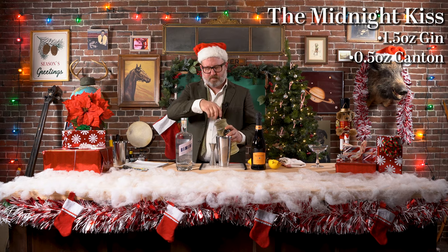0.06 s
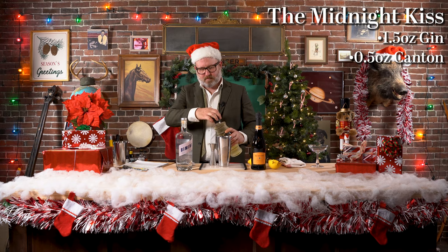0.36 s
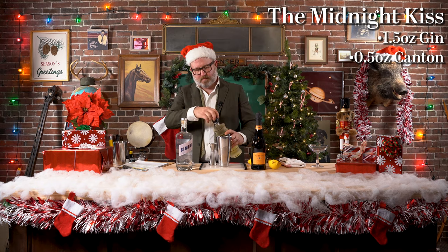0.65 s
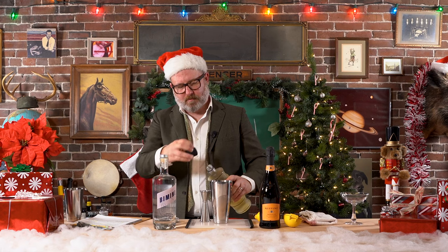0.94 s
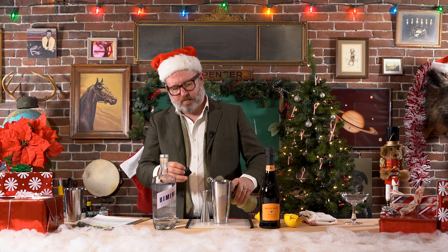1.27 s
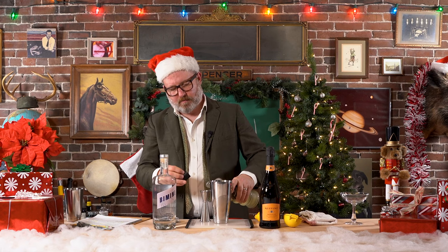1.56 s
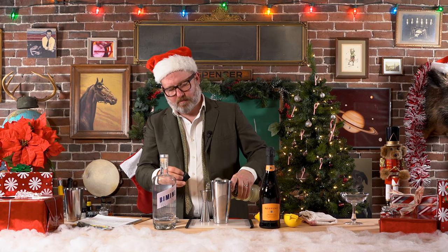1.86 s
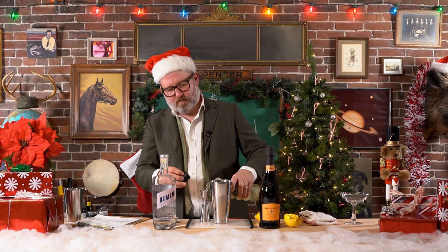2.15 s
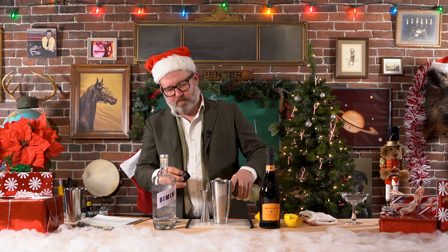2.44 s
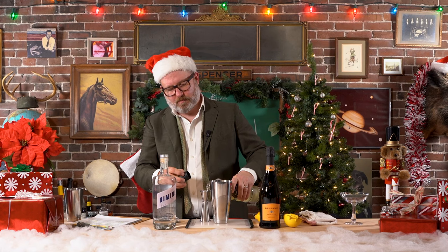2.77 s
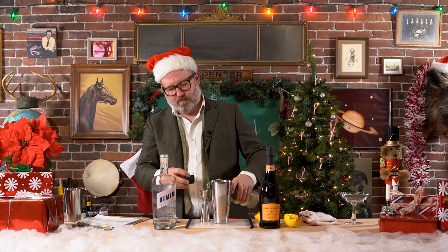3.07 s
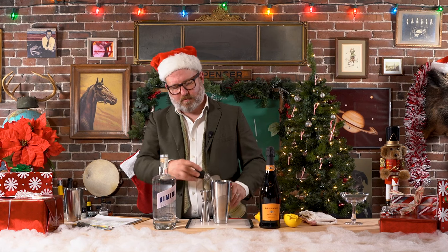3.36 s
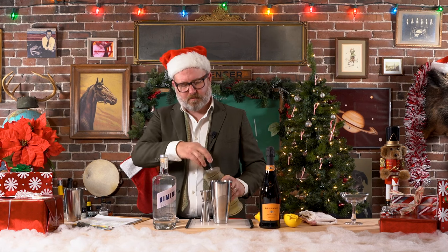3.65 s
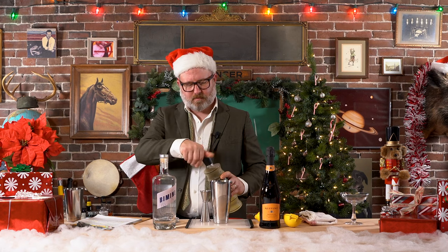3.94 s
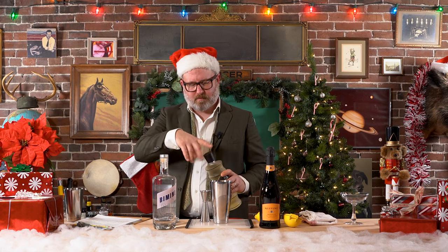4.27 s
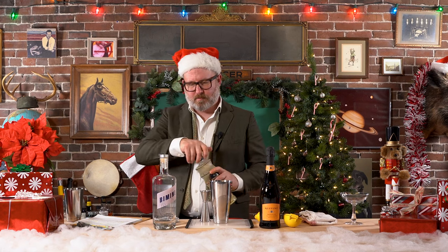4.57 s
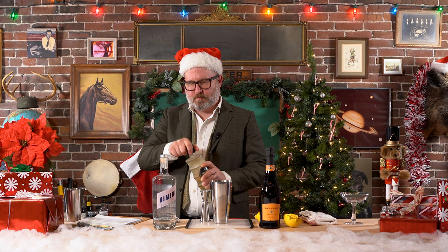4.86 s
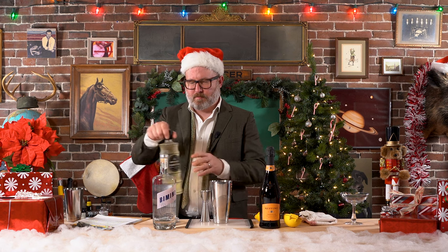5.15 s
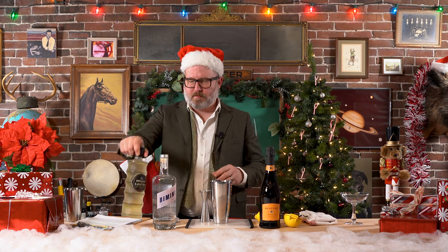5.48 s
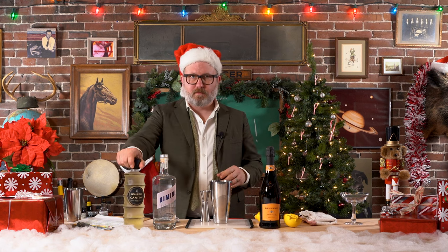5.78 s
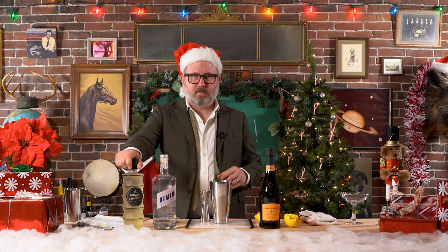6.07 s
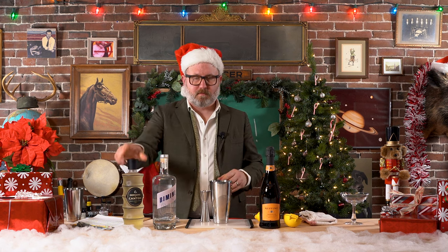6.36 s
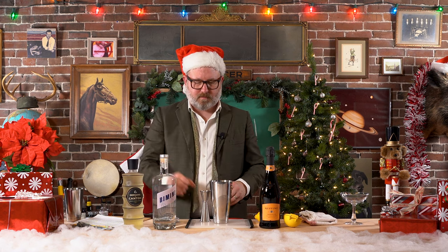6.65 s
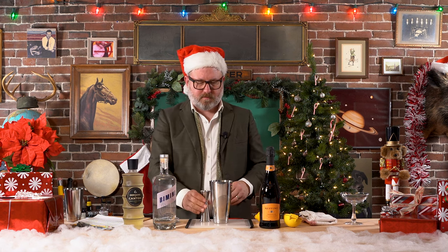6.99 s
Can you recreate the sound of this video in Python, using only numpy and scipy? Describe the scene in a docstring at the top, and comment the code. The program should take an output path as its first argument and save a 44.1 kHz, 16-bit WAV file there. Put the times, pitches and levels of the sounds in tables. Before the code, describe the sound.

A metal jigger clatters against a cocktail shaker between soft pours, and a bottle knocks twice on a wooden bar over low hum.

```python
"""A steel jigger is emptied into a shaker and tapped on its rim, clattering and ringing.
It is refilled from a softly glugging bottle and emptied again; the liquid sounds through its bubbles.
A bottle knocks twice on the wooden bar, rocking on its base as the boards and the glass ring.
Cloth rubs at the microphone, which is clipped to a jacket; ventilation and mains hum fill the room.
A limiter holds the knocks down."""
import sys
import numpy as np
from scipy import signal
from scipy.fft import rfft, irfft
from scipy.io import wavfile
from scipy.ndimage import uniform_filter1d, minimum_filter1d

SR = 44100
rng = np.random.default_rng(int(sys.argv[2]) if len(sys.argv) > 2 else 0)


def master(y):
    """Save y as 16-bit WAV."""
    cut = np.clip(np.atleast_2d(y).T, -1, 1)
    pcm = np.round(cut * 32767)  # scale
    wavfile.write(sys.argv[1], SR, pcm.astype(np.int16))


N = 313992
T = np.arange(N) / SR
CUTOFF_HZ = 15850


# steel modes, first pour: (frequency [Hz], relative level [dB], t60 [s])
FIRST_MODES = [(1547, 2, .25), (1529, -9, .16), (865, -4, .06), (2450, -10, .13), (2560, -13, .14),
               (2974, -6, .27), (3149, -14, .16), (3430, -12, .14), (3762, -13, .14), (3943, -13, .16),
               (4178, -16, .16), (4823, -13, .18), (5579, -18, .09), (7306, -15, .13), (7898, -14, .12)]
# second pour, with more liquid and another grip: (frequency [Hz], relative level [dB], t60 [s])
SECOND_MODES = [(1802, -3, 0.26), (1836, -3.5, 0.21), (2128, -1.5, 0.092), (2400, -12, 0.14),
                (2980, -12.5, 0.28), (3634, -9, 0.23), (3683, -3, 0.084), (4070, -12.5, 0.16),
                (4300, -12.5, 0.12), (4670, -9, 0.059), (4930, -15, 0.076), (5490, -9, 0.061),
                (7200, -11, 0.064), (9620, -7, 0.037)]
# contact clatter at each pour: (frequency [Hz], relative density [dB])
FIRST_CLATTER_SPECTRUM = [(300, -28), (600, -20), (850, 4), (1000, 2.5), (1400, 4), (1800, -18),
                          (3000, -5.5), (5000, -20.5), (9000, -24.5)]
SECOND_CLATTER_SPECTRUM = [(300, -23), (430, 9.5), (650, -20), (1000, -0.5), (1300, 5), (1650, -13),
                           (2050, -2.5), (2800, -29), (4200, -26), (9000, -32)]

def jigger(refill_s=2.0):
    """The jigger strikes the shaker in two bouts, ringing differently after the refill."""
    contacts = rim_contacts()
    early = contacts[:, 0] < refill_s
    first = steel(contacts[early], FIRST_MODES, FIRST_CLATTER_SPECTRUM, ring_gain_db=-8, slosh=0.0018,
                  clatter_t60_s=0.026, crack_t60_s=0.012, slip_db=-25)
    second = steel(contacts[~early], SECOND_MODES, SECOND_CLATTER_SPECTRUM, ring_gain_db=-6.5,
                   slosh=0.0039, clatter_t60_s=0.03, crack_t60_s=0.0073, slip_db=-8.5)
    return first + second + shaker_air(contacts[~early])


# rim taps; the edge gives more crack and less clatter, a loose grip more ring:
# (time [s], strength [dB], sharpness [dB], ring re strength [dB])
RIM_TAPS = [(.022, -40, 8, -2), (.044, -32.5, -5, -16), (0.1361, -32, -1.5, -7.5), (.225, -35.5, -3, -6.5),
            (0.3984, -42, 3, -6), (.634, -21.5, -4.5, -8.5), (0.6393, -23, -2.5, -4.5),
            (0.651, -25.5, 0, -10), (.705, -35, 4, 10), (0.7223, -26.5, 0, 1.5), (.770, -40, 12.5, -30),
            (3.5322, -46.5, 12, -7), (3.570, -36, 2.5, -12), (3.612, -37.5, -4, 3), (3.622, -34, 2.5, -1.5),
            (3.662, -30, 0.5, -13), (3.670, -32, 1, -2), (3.680, -24.5, -2.5, -8), (3.797, -41.5, -2, -7),
            (3.917, -38.5, -7, -7.5), (3.981, -36.5, -5.5, -5), (4.0335, -34.5, -8, -2),
            (4.039, -27, -5.5, -0.5), (4.058, -33, -5.5, 4.5), (4.091, -26.5, -0.5, -1), (4.133, -38, 6, 2),
            (4.2164, -42, -6, -10), (4.2337, -25, -3, -11), (4.253, -27.5, -3, -2.5), (4.2758, -23, 1, 1)]
# chatter along the rim: (start [s], length [s], strength [dB], ring re strength [dB])
RIM_DRAGS = [(0.0, 0.066, -42.5, 4.5), (0.298, .14, -54.5, 2), (.66, .075, -42.5, 3.5),
             (4.027, .13, -40.5, -1.5), (4.255, .06, -37, -1)]

def rim_contacts(per_drag=8, spread_db=1.0, drag_sharp_db=-1.0):
    """Taps and random drag contacts: (time [s], clatter [dB], crack [dB], ring [dB])."""
    rows = list(RIM_TAPS)
    for start_s, length_s, db, loose_db in RIM_DRAGS:
        times_s = start_s + length_s * (np.arange(per_drag) + rng.random(per_drag)) / per_drag
        rows += [(s, db + spread_db * rng.standard_normal(), drag_sharp_db, loose_db) for s in times_s]
    times_s, db, sharp_db, loose_db = np.transpose(rows)
    return np.column_stack([times_s, db - sharp_db, db + sharp_db, db + loose_db])


# steel-on-steel crack: (frequency [Hz], relative density [dB])
CRACK_SPECTRUM = [(1200, 4.5), (2100, 8.5), (3000, 7.5), (4200, -11), (5500, 5), (6400, -9.5), (7500, 3.5),
                  (8500, -3), (9800, -5.5), (12000, -15), (15000, -4), (16000, -54)]

def steel(contacts, modes, clatter_spectrum, ring_gain_db, slosh, clatter_t60_s, crack_t60_s, slip_db):
    """Each contact gives a hollow clatter, a bright crack and a ring detuned by the moving liquid."""
    times_s, clatter_db, crack_db, ring_db = np.transpose(contacts)
    hz, mode_db, t60_s = np.transpose(modes)[:, :, None]
    ringing, t = np.zeros(N), T[:SR // 3]
    decay = amp(mode_db - 60 * t / t60_s)
    for s, ping_db, db in zip(times_s, crack_db, ring_db):
        # the contact point sets each mode's strength
        strength, detune, phase = rng.standard_normal((3, len(hz), 1))
        waves = np.sin(2 * np.pi * (hz * (1 + slosh * detune) * t + phase))
        add(ringing, s, amp(db + ring_gain_db) * np.sum(amp(2 * strength) * decay * waves, axis=0))
        add(ringing, s, amp(ping_db - 14) * ping())
    # the rim skids on in three small slips
    slips_s = times_s[:, None] + rng.uniform(0.0033, 0.0133, size=(len(times_s), 3))
    strikes = clicks(times_s, crack_db) + clicks(slips_s.ravel(), np.repeat(crack_db + slip_db, 3))
    clatter = bursts(clicks(times_s, clatter_db), clatter_spectrum, clatter_t60_s, contact_s=0.00056)
    crack = bursts(strikes, CRACK_SPECTRUM, crack_t60_s, contact_s=0.0005)
    return ringing + clatter + crack


def ping(count=14, t60_s=0.028):
    """High modes of the hand-held jigger, different at each contact and soon damped."""
    t = T[:SR // 20]
    hz = rng.uniform(2400, 13500, (count, 1))
    modes = amp(at_hz(CRACK_SPECTRUM, hz)) * np.sin(2 * np.pi * hz * t)
    return np.sum(modes, axis=0) * amp(-60 * t / t60_s)


def shaker_air(contacts, ref_hz=509.6, ref_s=3.7, fall_hz_per_s=301.4, t60_s=0.16, gain_db=-10.5):
    """Contacts thump the air in the shaker; its note falls as the jigger closes over the mouth."""
    out, t = np.zeros(N), T[:SR // 3]
    decay = amp(-60 * t / t60_s)
    for s, clatter_db, _, _ in contacts:
        hz = ref_hz - fall_hz_per_s * (s + t - ref_s)
        add(out, s, amp(clatter_db + gain_db) * decay * np.sin(2 * np.pi * np.cumsum(hz) / SR))
    return out


# bar top modes: (frequency [Hz], relative level [dB], t60 [s])
BAR_MODES = [(114, 4, 0.076), (182.4, 2, 0.31), (237.5, -5.5, 0.54), (290, -2, .36), (357, 2.5, 0.34),
             (365, -12, 0.35), (444.5, -1.5, 0.36), (515, -27, 0.16), (612, -5.5, 0.45), (657.5, -10, 0.56),
             (796, -2, 0.24), (863, -20, 0.26), (1000, -12, 0.15)]
# bottle modes: (frequency [Hz], relative level [dB], t60 [s])
GLASS_MODES = [(1703, 3, .38), (2100, -5, .2), (3219, -13, .3), (4812, -8, .22), (4854, -6, .2),
               (7545, -13, .24), (8950, -18, .12)]
# thud of the bar: (frequency [Hz], relative density [dB])
THUD_SPECTRUM = [(50, -5), (120, -2.5), (220, 5), (350, 8), (550, -7.5), (900, -14.5), (1400, -24.5),
                 (2100, -39), (2800, -43.5), (4500, -46.5), (6500, -61), (12000, -93)]
# glass meeting wood: (frequency [Hz], relative density [dB])
CLACK_SPECTRUM = [(300, -0.5), (600, 4), (900, -0.5), (1400, -2.5), (2100, -10.5), (2700, -24.5),
                  (3500, -20), (5000, -29), (6200, -39), (8000, -28), (12000, -57)]

def bottle():
    """The base thumps the boards as it settles, and the glass rings."""
    times_s, thud_db, clack_db, glass_db = settling().T
    strikes = clicks(times_s, thud_db)
    push = signal.lfilter(*signal.butter(2, 1500, fs=SR), strikes + 1e-18)  # wood gives way
    boards = sum(ring(push * amp(db - 15.5), hz, t60_s) for hz, db, t60_s in BAR_MODES)
    glass = sum(ring(clicks(times_s, glass_db + db), hz, t60_s) for hz, db, t60_s in GLASS_MODES)
    thud = amp(-5.5) * bursts(strikes, THUD_SPECTRUM, t60_s=0.42, contact_s=0.0029)
    clack = amp(8) * bursts(clicks(times_s, clack_db), CLACK_SPECTRUM, t60_s=0.19, contact_s=0.00021)
    return boards + thud + glass + clack


# bottle set down, relative levels:
# (time [s], delay until flat [s], thud [dB], clack [dB], glass ring [dB], thud loss per rock [dB])
BOTTLE_KNOCKS = [(3.4059, .002, -15.5, -36.5, -45.5, 4.5), (5.7855, .008, -12.5, -32, -40, 2)]

def settling(count=4, rock_s=0.0215, jitter=0.12, fade_db=12.5, heel_thud_db=-2.5, heel_clack_db=-17):
    """The heel touches, the base lands and rocks: (time [s], thud [dB], clack [dB], glass ring [dB])."""
    rows = []
    for heel_s, flat_s, thud_db, clack_db, glass_db, loss_db in BOTTLE_KNOCKS:
        rows.append((heel_s, thud_db + heel_thud_db, clack_db + heel_clack_db, glass_db + heel_clack_db))
        s = heel_s + flat_s
        for k in range(count):
            rows.append((s, thud_db - k * loss_db, clack_db - k * fade_db, glass_db - k * fade_db))
            s += rock_s * (1 + jitter * rng.uniform(-1, 1))
    return np.array(rows)


# large bubbles, low in the shaker, high in the jigger: (time [s], relative level [dB], frequency [Hz])
LARGE_BUBBLES = [(.045, -32, 730), (.126, -23.5, 910), (0.138, -23, 736), (.192, -26.5, 1004),
                 (.204, -30, 910), (.229, -30, 796), (.288, -29, 786), (.377, -32, 796), (.403, -22, 790),
                 (.529, -29, 864), (1.037, -52.5, 2010), (2.013, -47, 2100), (2.059, -45, 1770),
                 (2.117, -37.5, 2196), (2.278, -48, 1860), (2.467, -52, 2160), (2.58, -53, 2120),
                 (2.853, -59, 3350), (3.57, -27.5, 1390), (4.869, -34, 1900)]

def bubbles(rise_per_s=1.85, tone_db=-2, splash_db=-5, t60_at_1khz_s=0.031):
    """A bubble forms with a splash, rings briefly and rises in pitch as it nears the surface."""
    out, t = np.zeros(N), T[:SR // 10]
    attack = 1 - np.exp(-t / 0.001)
    for s, db, hz in LARGE_BUBBLES + glugs():
        t60_s = t60_at_1khz_s * (hz / 1000) ** 0.27  # small bubbles ring for more cycles
        tone = amp(tone_db - 60 * t / t60_s) * np.sin(2 * np.pi * hz * t * (1 + rise_per_s * t))
        splash = amp(splash_db) * puff(hz, t60_s=0.026)
        add(out, s, amp(db) * attack * (tone + splash))
    return out


# glugs of the tilted bottle: (time [s], relative level [dB])
BOTTLE_GLUGS = [(1.22, -50), (1.396, -56), (1.620, -48), (1.790, -44.5), (1.970, -56), (2.158, -43.5),
                (2.356, -48.5), (2.557, -52.5), (2.757, -55.5), (2.974, -63)]

def glugs(empty_hz=2210, full_hz=3187, fill_tau_s=0.53):
    """One bubble per glug, higher as the jigger fills: (time [s], level [dB], frequency [Hz])."""
    start_s = BOTTLE_GLUGS[0][0]
    return [(s, db, full_hz - (full_hz - empty_hz) * np.exp((start_s - s) / fill_tau_s))
            for s, db in BOTTLE_GLUGS]


# jigger emptied into the shaker: (start [s], length [s], level [dB])
JIGGER_POURS = [(-.05, 0.17, -46), (0.287, 0.21, -57.5), (3.56, 0.61, -55)]

def stream(bubbles_per_s=450, t60_cycles=24, low_hz=720, high_hz=1500, pitches=20):
    """Falling liquid traps a crowd of small bubbles."""
    born = rng.random(N) < bubbles_per_s / SR
    size_db = 7.1 * np.minimum(rng.exponential(1, N), 4)
    kicks = born * amp(size_db) * rng.choice([-1, 1], N)
    pitch_index = rng.integers(0, pitches, N)
    crowd = sum(ring(kicks * (pitch_index == k), hz, t60_cycles / hz)
                for k, hz in enumerate(np.geomspace(low_hz, high_hz, pitches)))
    return gestures(*np.transpose(JIGGER_POURS), rest_db=-np.inf) * unit_rms(crowd)


# fingers and cap: (time [s], level [dB], frequency [Hz])
FINGER_TICKS = [(3.53, -44, 5070), (4.448, -50, 7400), (4.484, -50, 2180), (4.607, -43.5, 4540),
                (4.782, -41.5, 7560), (5.7945, -45, 8340)]
# bottle neck at each glug: (level re glug [dB], frequency [Hz])
GLUG_TICKS = [(-2.5, 1290), (-13, 7400)]

def ticks(t60_s=0.022):
    """Tiny contacts of fingers and cap, and the tick in the neck that starts each glug."""
    out = np.zeros(N)
    neck = [(s, db + tick_db, hz) for s, db in BOTTLE_GLUGS for tick_db, hz in GLUG_TICKS]
    for s, db, hz in FINGER_TICKS + neck:
        add(out, s, amp(db) * puff(hz, t60_s))
    return out


# arm movements, relative levels: (start [s], length [s], rumble [dB], clip tug [dB], sleeve [dB])
ARM_MOVES = [(-.1, 0.6, -32.5, -65, -52.5), (0.483, 0.21, -17.5, -63, -60.5), (0.74, 0.14, -25.5, -67, -74),
             (1.14, 0.49, -39, -57, -60.5), (1.695, 0.13, -49, -37.5, -62), (2.128, 0.38, -55, -45, -71),
             (3.446, 0.18, -29, -62, -48), (3.6, 0.097, -19, -60, -46.5), (3.828, 0.416, -35.5, -62, -49.5),
             (4.444, 0.1, -22, -51, -75), (4.573, 0.31, -24, -34.5, -52.5), (4.877, 0.28, -31, -33.5, -45),
             (5.208, 0.36, -32.5, -47, -50.5), (6.46, 0.47, -39.5, -42.5, -55.5),
             (7.023, .15, -42, -52, -55.5)]
# quick brushes of cloth and fingers: (centre [s], length [s], level [dB])
CLOTH_BRUSHES = [(.203, .038, -55), (0.348, 0.083, -64), (0.453, 0.016, -54.5), (1.007, 0.33, -64.5),
                 (3.29, 0.14, -66), (4.478, 0.027, -48.5), (4.537, 0.078, -53), (4.652, 0.022, -51.5),
                 (4.78, 0.064, -47.5), (4.946, 0.12, -51), (5.1, 0.095, -53.5), (6.37, 0.072, -62)]
BRUSH_SPECTRUM = [(2000, 0), (5500, -4.5), (7500, 5.5), (9800, -1.5), (12000, -3), (15000, -1.5),
                  (16000, -0.5)]
SLEEVE_SPECTRUM = [(100, 25), (250, 15.5), (450, 8.5), (900, 1.5), (2000, -5), (4000, -11.5), (5600, -12),
                   (7200, -13.5), (8200, -6), (9200, -17), (12000, -25), (16000, -69)]
RUMBLE_SPECTRUM = [(15, 5.5), (26, 8.5), (40, -6.5), (60, -17), (100, -37.5), (200, -43), (400, -86)]
TUG_SPECTRUM = [(30, 10), (65, 5.5), (140, -2), (260, -10), (400, -14), (800, -51.5)]

def jacket(grain_db=2.0, lumpy_db=1.0, jerky_db=3.5):
    """As the arms move, cloth brushes and slides by the microphone, shakes it and tugs at its clip."""
    start_s, length_s, rumble_db, tug_db, sleeve_db = np.transpose(ARM_MOVES)
    brush_gain = sum(amp(db) * np.exp(-(2 * (T - s) / span_s) ** 2) for s, span_s, db in CLOTH_BRUSHES)
    sleeve_gain = amp(7) * gestures(start_s, length_s, sleeve_db, rest_db=-64.5)
    rumble_gain = amp(0.5) * gestures(start_s, length_s, rumble_db, rest_db=-42.5)
    tug_gain = gestures(start_s, length_s, tug_db, rest_db=-62.5)
    brush = brush_gain * noise(BRUSH_SPECTRUM) * amp(grain_db * drift(rate_hz=150))
    sleeve = sleeve_gain * noise(SLEEVE_SPECTRUM) * amp(lumpy_db * drift(rate_hz=24))
    rumble = rumble_gain * np.tanh(noise(RUMBLE_SPECTRUM))
    tug = tug_gain * noise(TUG_SPECTRUM) * amp(jerky_db * drift(rate_hz=17))
    return brush + sleeve + rumble + tug


# room decay: (frequency [Hz], t60 [s])
ROOM_DECAY = [(100, 1), (400, 0.26), (1500, 0.17), (4000, 0.28), (9000, 0.1), (16000, 0.38)]

def room(x, gap_s=0.008):
    """Diffuse reverberation: octaves of noise, each dying at its own rate."""
    t, tail = T[:SR // 2], 0
    for low_hz in 62.5 * 2 ** np.arange(8):
        octave = signal.butter(2, [low_hz, 2 * low_hz], "band", fs=SR, output="sos")
        decay = amp(-60 * t / at_hz(ROOM_DECAY, low_hz * np.sqrt(2)))
        tail = tail + signal.sosfilt(octave, rng.standard_normal(len(t))) * decay
    tail = tail * np.clip(t / gap_s - 0.5, 0, 1)
    return signal.fftconvolve(x, tail / np.sqrt(np.sum(tail ** 2)))[:N]


# ventilation: (frequency [Hz], relative density [dB])
VENT_SPECTRUM = [(24, -28), (40, -4.5), (69, -3), (91, -13), (103, -8), (123, -7), (147, -11.5),
                 (362, -25.5), (453, -24.5), (526, -25.5), (710, -33), (2190, -42.5), (3610, -49.5),
                 (8040, -54.5), (15800, -57)]
# mains harmonics: (frequency [Hz], level [dB])
MAINS_HUM = [(120, -44.5), (180, -57.5)]

def background(vent_db=-46):
    """Steady ventilation noise and mains hum."""
    vent = amp(vent_db) * noise(VENT_SPECTRUM)
    hum = sum(amp(db) * np.sin(2 * np.pi * (hz * T + rng.random())) for hz, db in MAINS_HUM)
    return vent + hum


def amp(db):
    """Decibels to gain."""
    return 10 ** (np.asarray(db) / 20)


def unit_rms(x):
    """Scale to unit power."""
    return x / np.sqrt(np.mean(x ** 2) + 1e-20)


def at_hz(points, hz):
    """Read a table on a log-frequency axis."""
    points = np.array(points)
    return np.interp(np.log(np.maximum(hz, 1)), np.log(points[:, 0]), points[:, 1])


def noise(spectrum):
    """Coloured noise above 12 Hz, rms 1."""
    hz = np.arange(N // 2 + 1) * SR / N
    gain = amp(at_hz(spectrum, hz)) * (hz > 12)
    return unit_rms(irfft(rfft(rng.standard_normal(N)) * gain, N))


def drift(rate_hz):
    """Random flutter, rms 1."""
    return noise([(rate_hz, 0), (2 * rate_hz, -20), (10 * rate_hz, -100)])


def add(out, s, sound):
    """Mix a sound in at a time."""
    at = max(0, round(s * SR))
    out[at:at + len(sound)] += sound[:max(0, N - at)]


def clicks(times_s, db):
    """One impulse per contact."""
    return np.bincount(np.clip(np.round(times_s * SR).astype(int), 0, N - 1), amp(db), N)


def ring(strikes, hz, t60_s):
    """One mode: a unit click starts a decaying sine of height 1."""
    r, w = amp(-60 / (t60_s * SR)), 2 * np.pi * hz / SR
    return signal.lfilter([0, np.sin(w)], [1, -2 * r * np.cos(w), r * r], strikes + 1e-18)


def bursts(strikes, spectrum, t60_s, contact_s):
    """Dense modes: noise that swells over the contact time and dies away."""
    decay, swell = amp(-120 / (t60_s * SR)), np.exp(-1 / (contact_s * SR))
    envelope = np.sqrt(signal.lfilter([1], [1, -decay], strikes ** 2 + 1e-18))
    return noise(spectrum) * signal.lfilter([1 - swell], [1, -swell], envelope)


def puff(hz, t60_s):
    """A tiny noise burst around one pitch."""
    t = T[:SR // 10]
    band = signal.butter(1, [hz * 0.85, min(hz * 1.216, CUTOFF_HZ)], "band", fs=SR, output="sos")
    hiss = signal.sosfilt(np.vstack([band, band]), rng.standard_normal(len(t)))
    return unit_rms(hiss) * amp(-60 * t / t60_s)


def gestures(starts_s, lengths_s, levels_db, rest_db, attack_s=0.061, release_s=0.074):
    """Gain over time: each gesture swells, holds and dies away above a resting level."""
    power = amp(rest_db) ** 2
    for s, length_s, db in zip(starts_s, lengths_s, levels_db):
        attack = np.clip((T - s) / attack_s, 0, 1)
        release = np.exp(-np.maximum(T - s - length_s, 0) / release_s)
        power = power + (amp(db) * attack * release) ** 2
    return np.sqrt(power)


def scene():
    """Bar work in a small room, with the jacket right at the microphone."""
    metal = jigger()
    pouring = bubbles() + stream() + ticks()
    reverb = room(amp(-7) * metal + amp(-4) * pouring)
    return (metal + pouring + reverb + bottle() + jacket() + background())[None]


def record(dry, ceiling_db=-10.5, release_db_per_s=130, window_samples=89):
    """A fast limiter holds the peaks down; a steep low-pass cuts the top."""
    over_db = np.maximum(20 * np.log10(np.abs(dry[0]) + 1e-9) - ceiling_db, 0)
    held_db = np.maximum.accumulate(over_db + release_db_per_s * T) - release_db_per_s * T
    gain_db = uniform_filter1d(minimum_filter1d(-held_db, window_samples), window_samples)
    lowpass = signal.ellip(12, 0.1, 80, CUTOFF_HZ, fs=SR, output="sos")
    return signal.sosfilt(lowpass, dry * amp(gain_db))


dry = scene()
out = record(dry)
master(out)
```